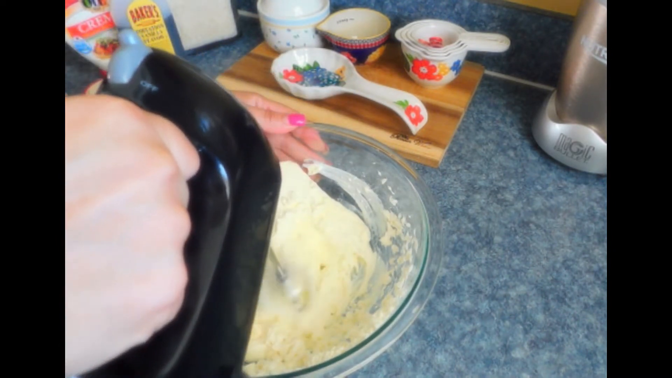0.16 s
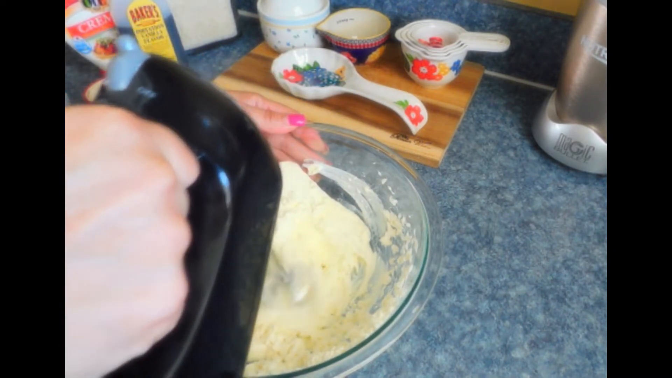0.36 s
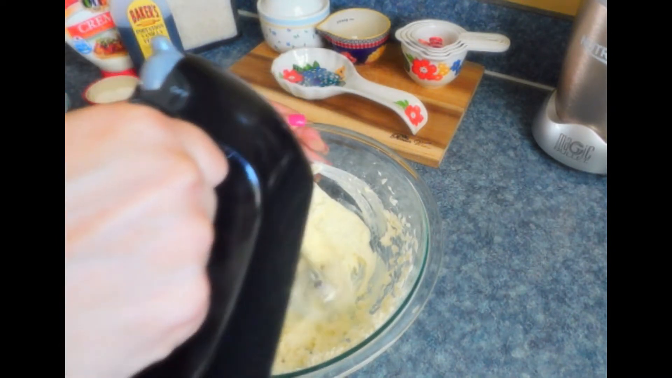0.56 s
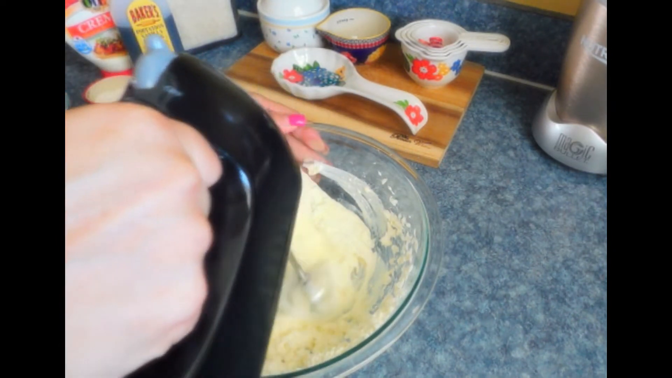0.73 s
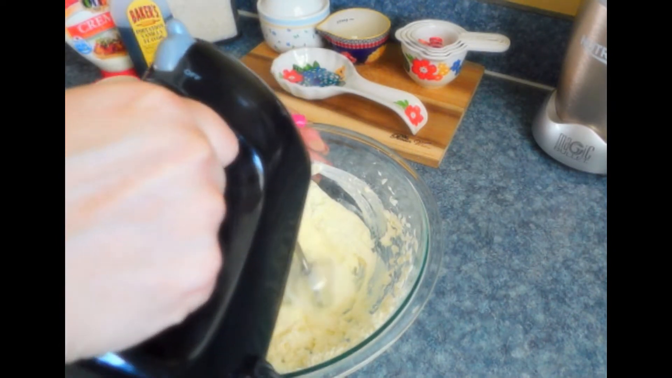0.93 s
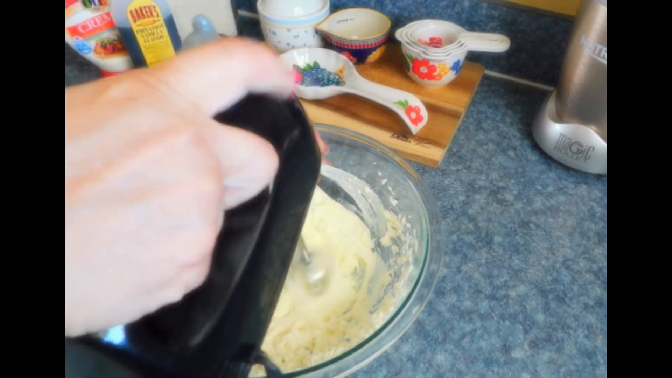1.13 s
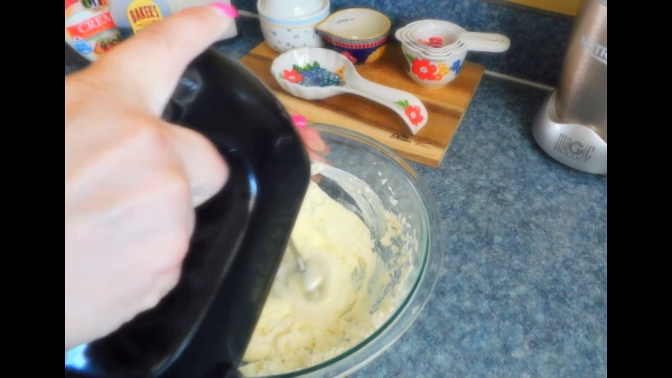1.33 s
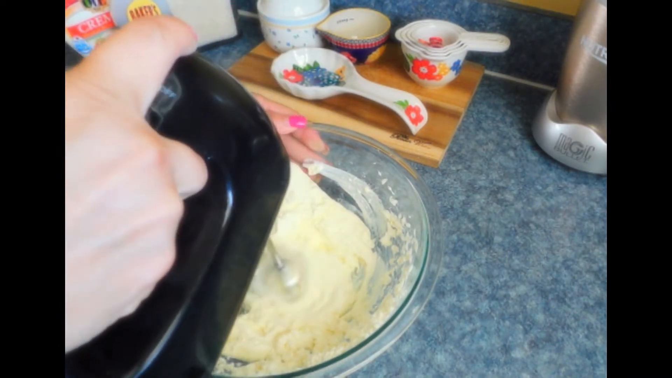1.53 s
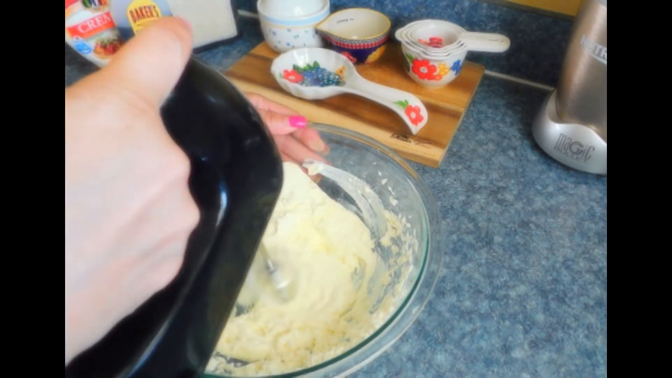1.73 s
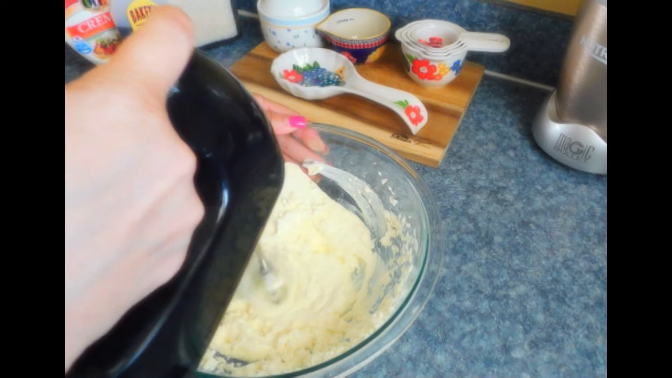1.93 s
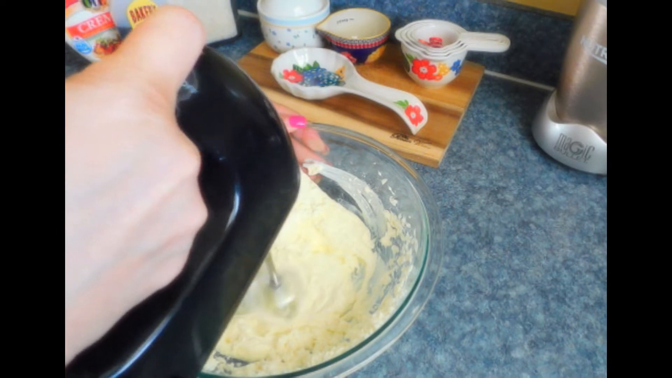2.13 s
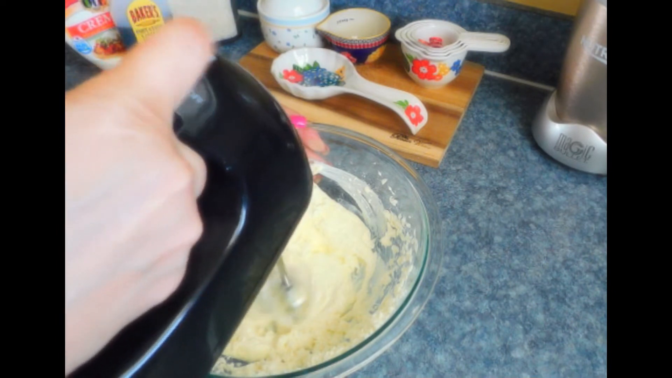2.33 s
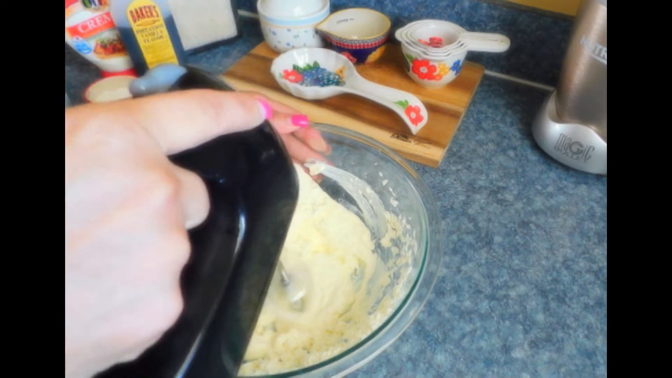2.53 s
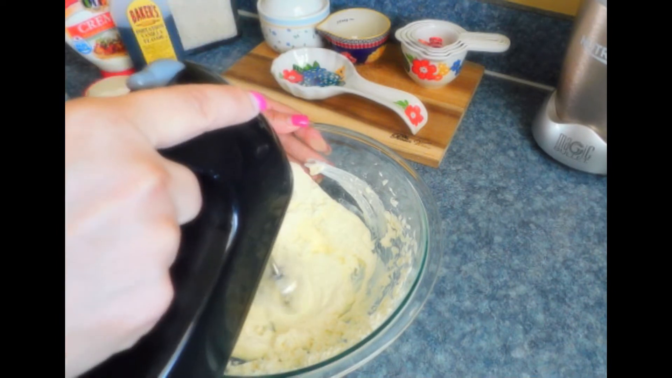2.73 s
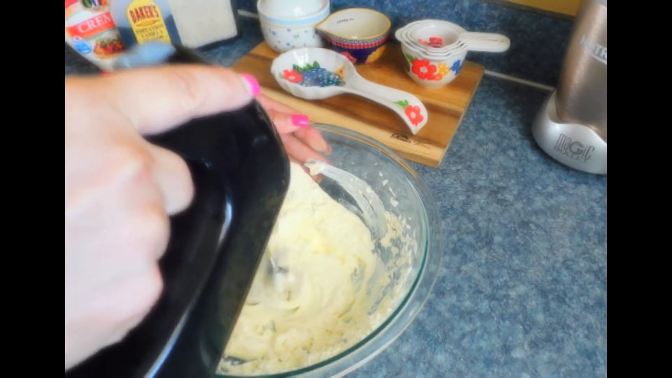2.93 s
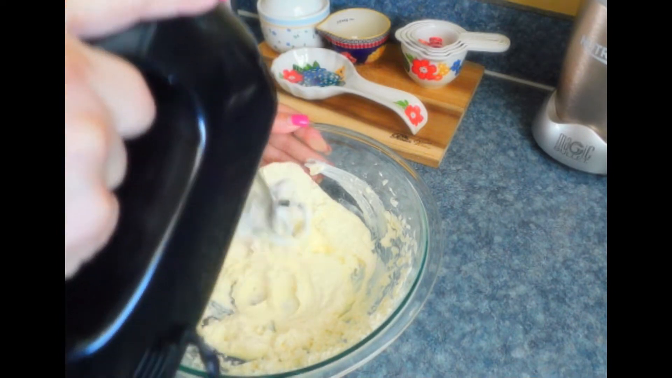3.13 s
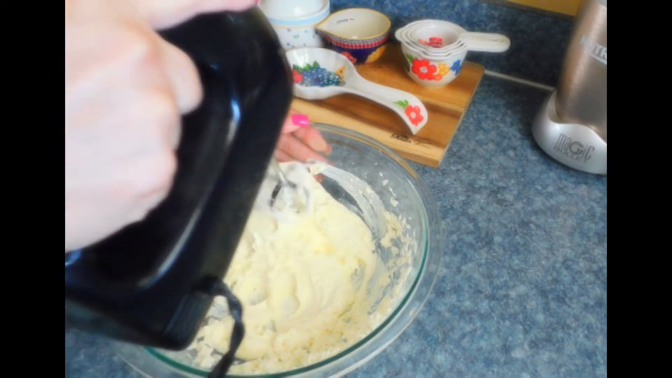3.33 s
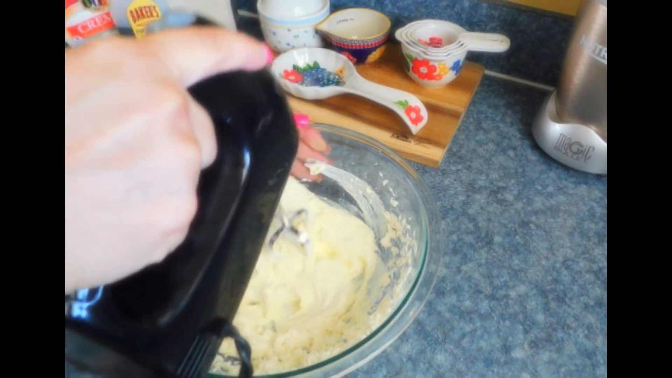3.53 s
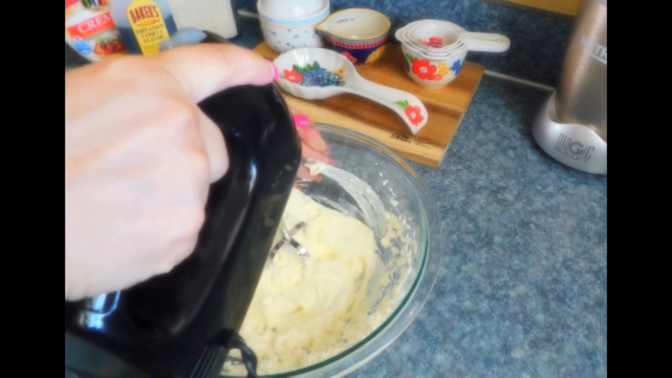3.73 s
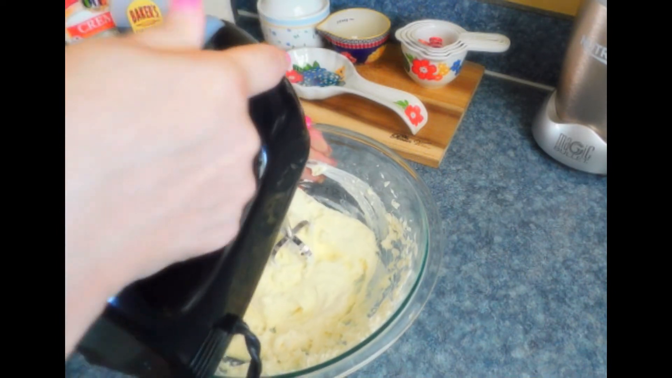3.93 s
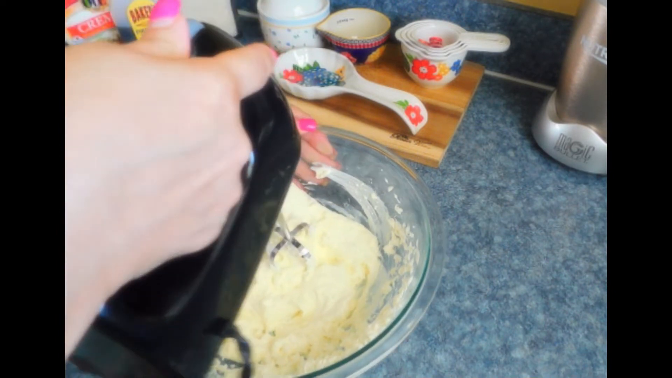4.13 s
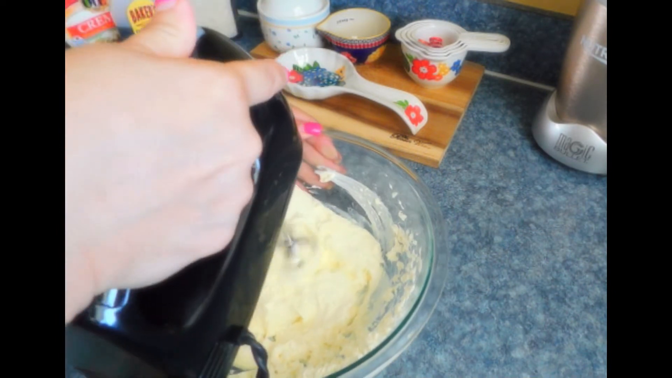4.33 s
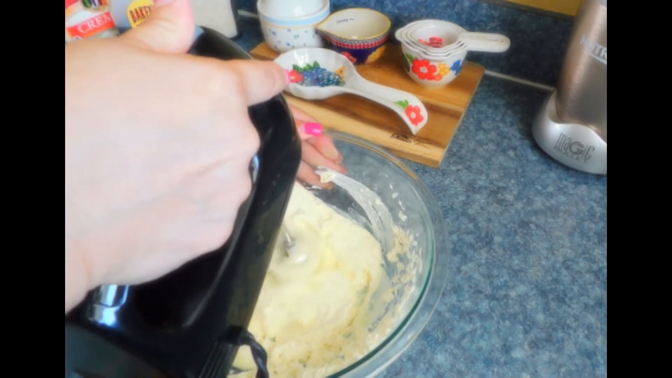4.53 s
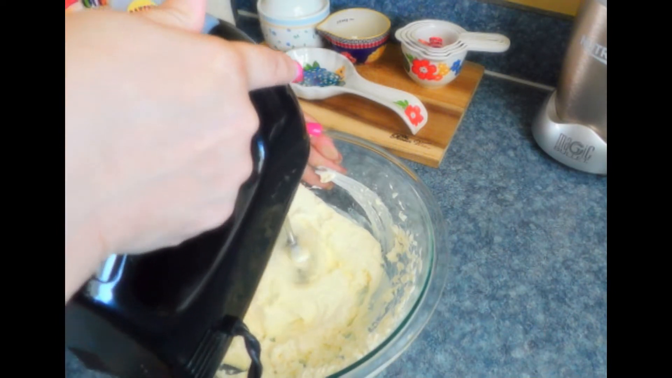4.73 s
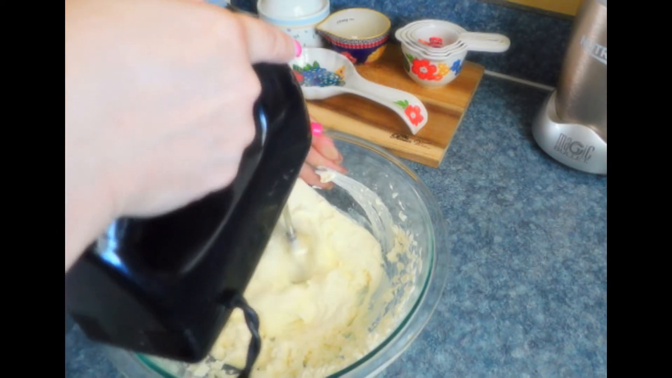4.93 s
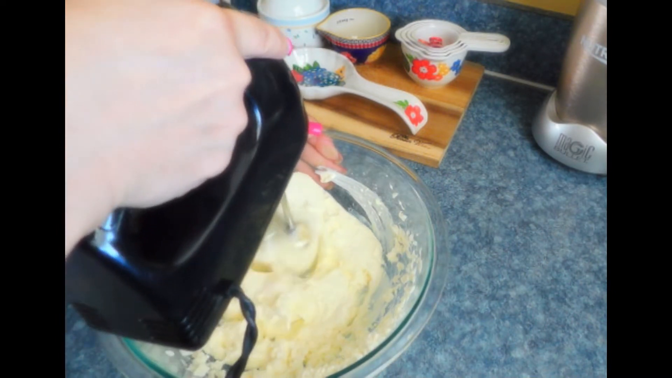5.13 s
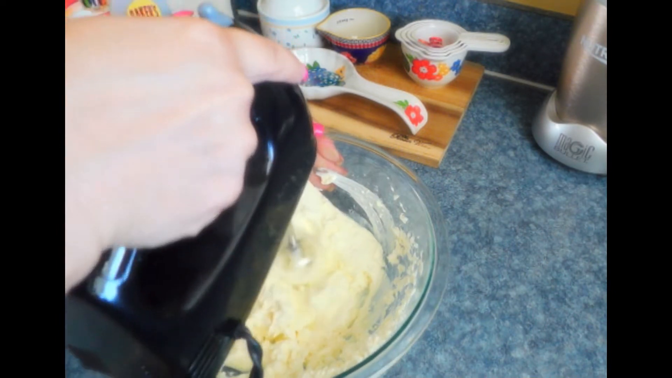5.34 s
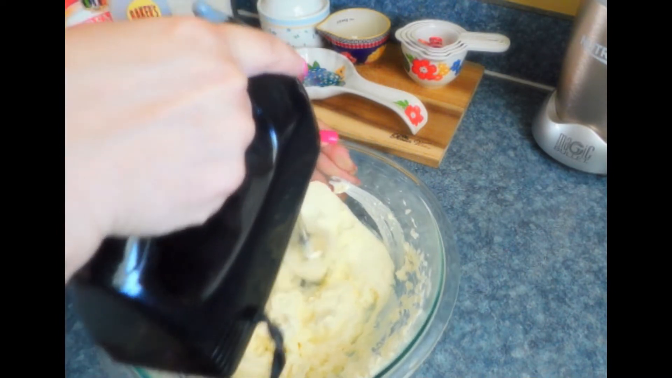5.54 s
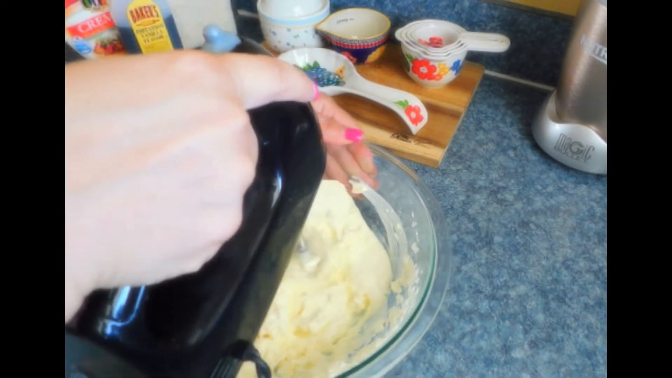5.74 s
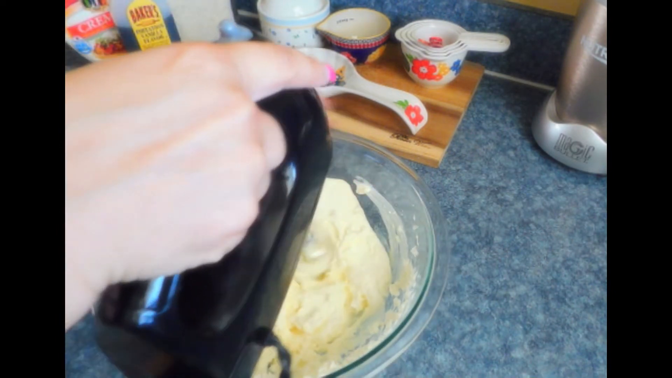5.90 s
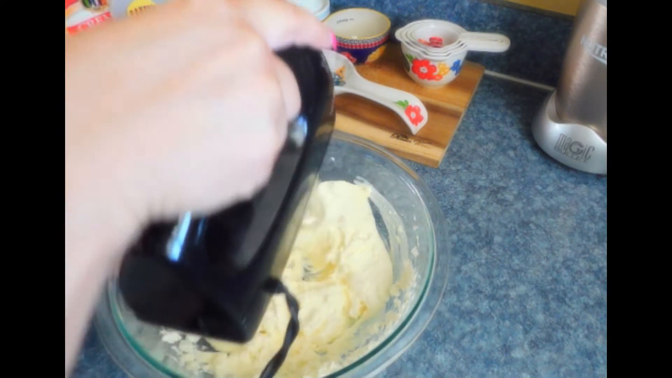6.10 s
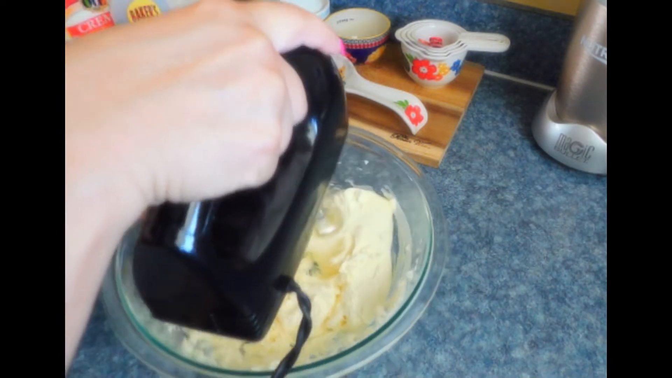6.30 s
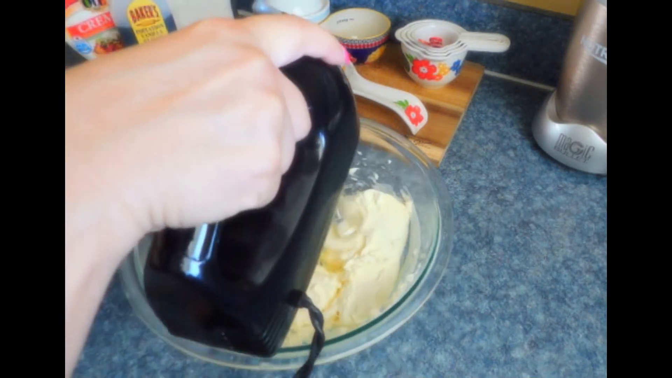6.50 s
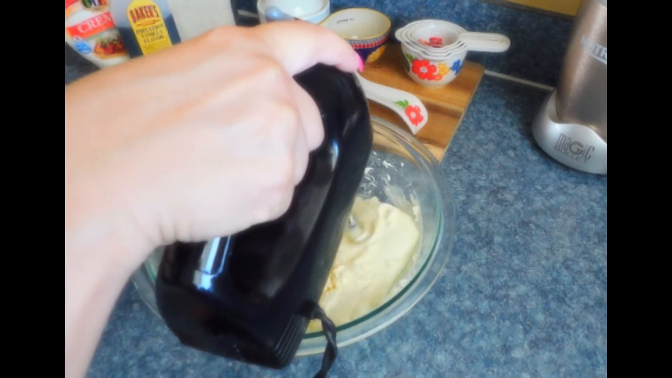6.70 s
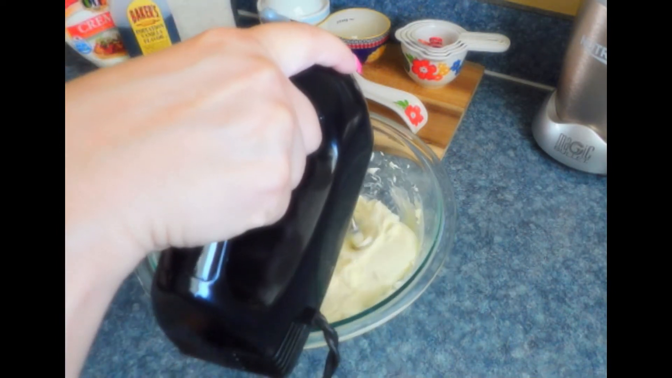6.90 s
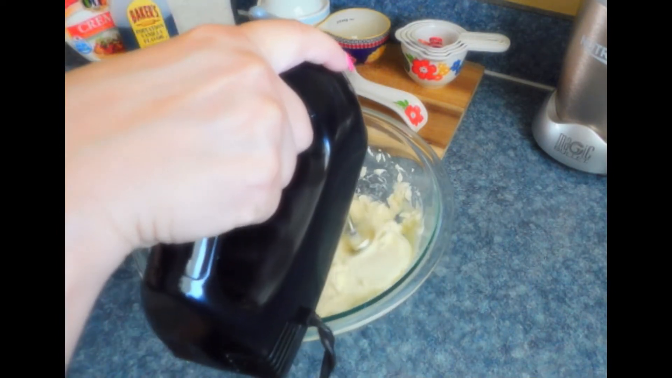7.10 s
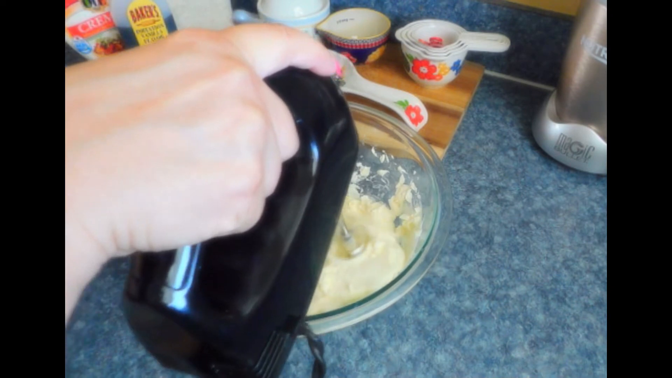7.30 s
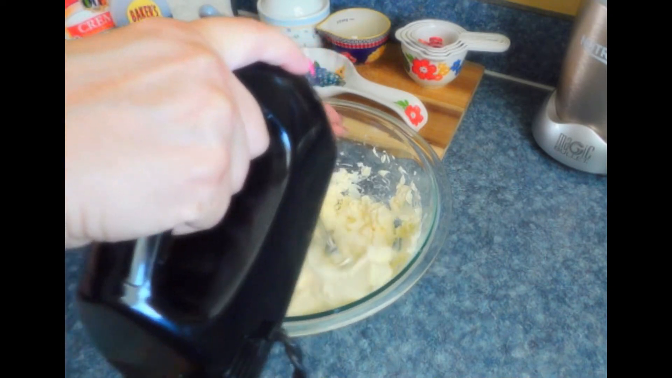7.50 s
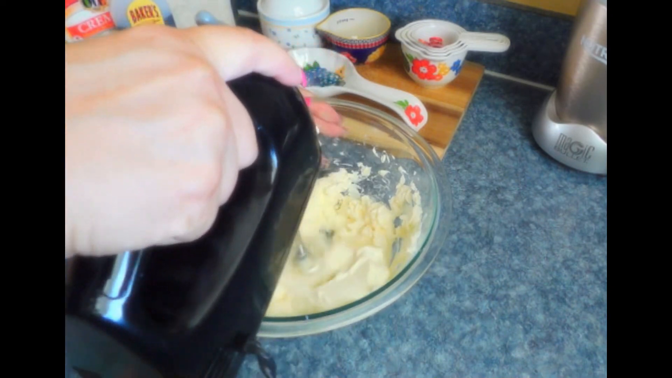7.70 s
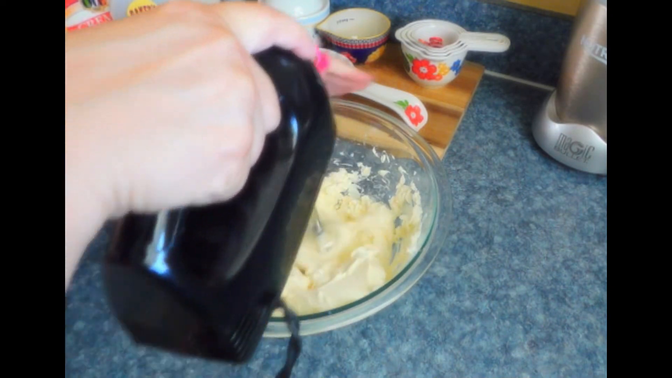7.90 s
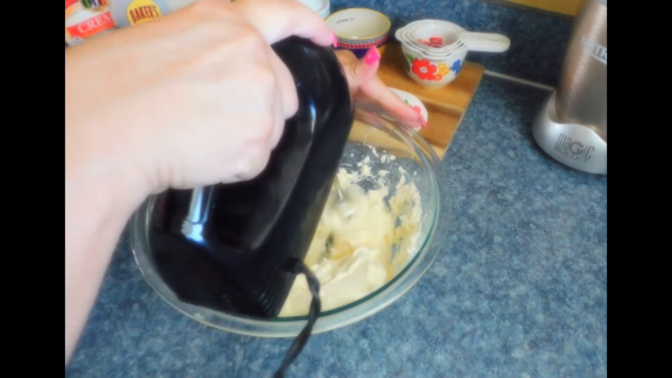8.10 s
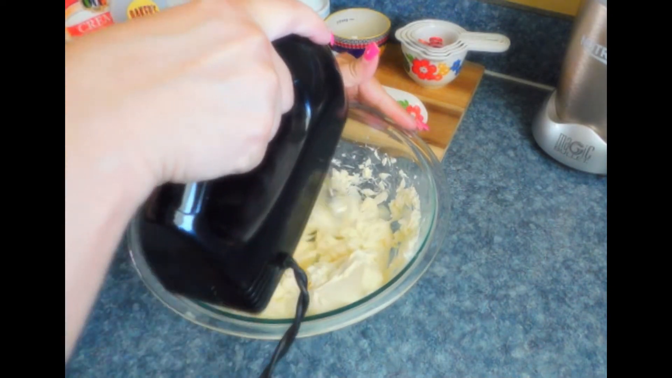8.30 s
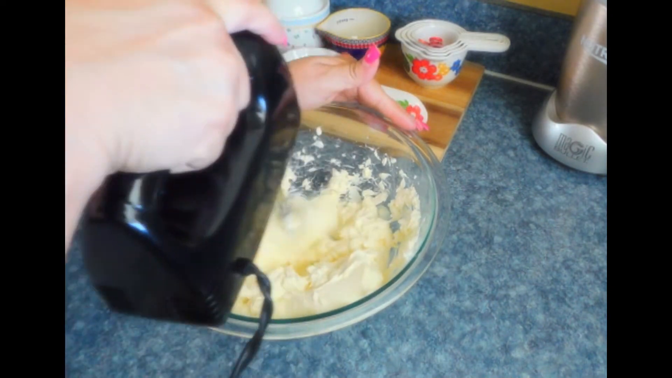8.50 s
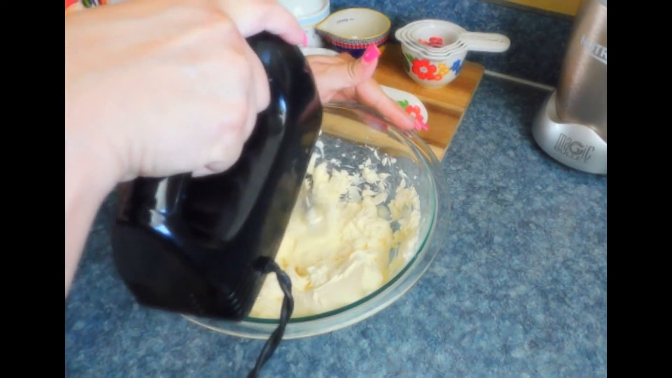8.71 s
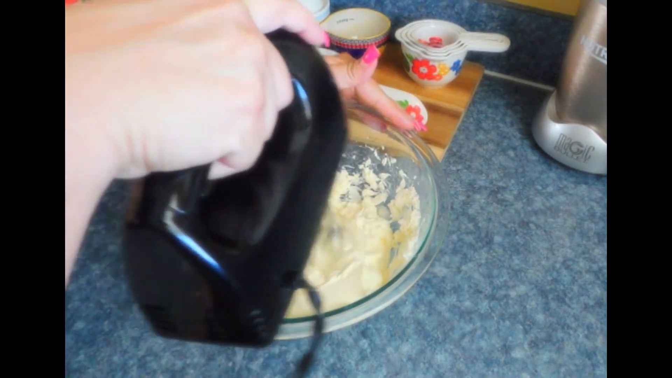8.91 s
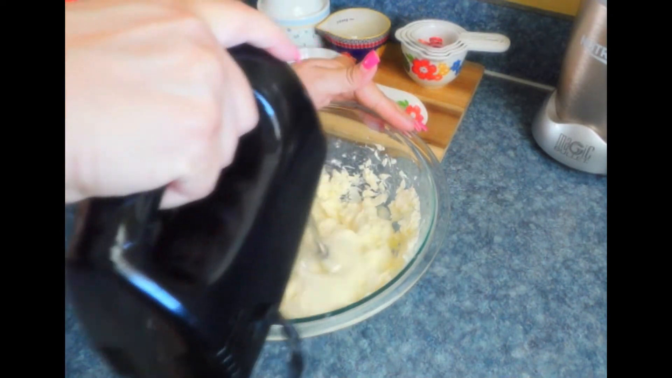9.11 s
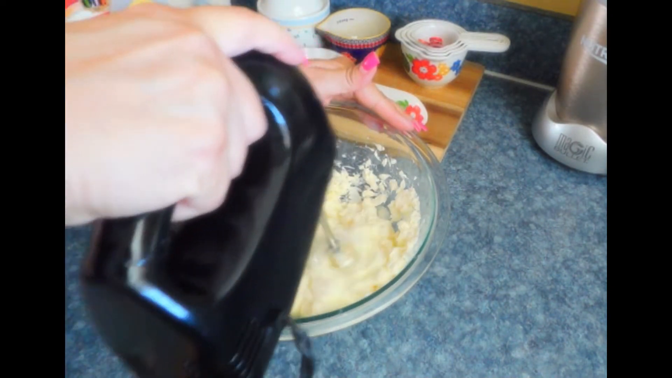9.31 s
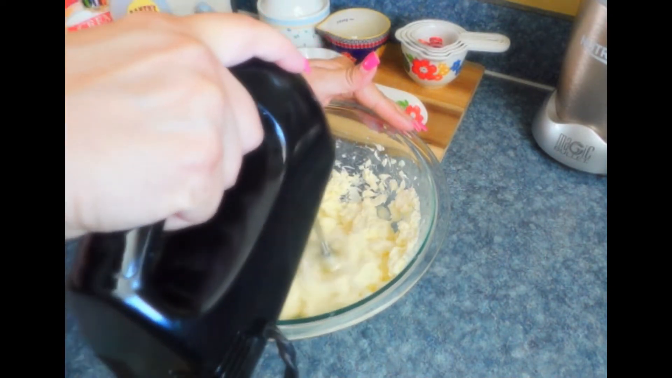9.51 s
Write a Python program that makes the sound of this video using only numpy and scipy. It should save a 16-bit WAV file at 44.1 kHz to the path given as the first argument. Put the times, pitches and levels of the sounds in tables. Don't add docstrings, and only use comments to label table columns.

```python
import sys
import numpy as np
from scipy import signal
from scipy.fft import rfft, irfft, next_fast_len
from scipy.io import wavfile
from scipy.ndimage import uniform_filter1d, map_coordinates

SR = 44100
rng = np.random.default_rng(int(sys.argv[2]) if len(sys.argv) > 2 else 0)


def undo_db(level):
    steps = np.asarray(level, float) / 20
    return 10 ** steps


def put_to_file(sound):
    columns = np.atleast_2d(sound).T
    safe = np.clip(columns, -1, 1)
    whole_steps = np.round(safe * 32767)
    wavfile.write(sys.argv[1], SR, whole_steps.astype(np.int16))


N = 421155

T = np.arange(N) / SR
POWER_OFF_S, POWER_ON_S, STOP_S, MAINS_HZ = 2.15, 4.278, 3.4, 60.0
POWERED = (T < POWER_OFF_S) | (T > POWER_ON_S)
MAINS_PULSE = POWERED * np.sin(2 * np.pi * 2 * MAINS_HZ * T)
SLOTS = 12
BITE_S, BITE_LENGTH_S = 4.665, .045
CONTACT_S = .0015
FRAME = 512
# multiple of shaft rate, centre t/s, length/s, level/dB
SHAFT_SWELLS = [(1, 2.9, .14, 6), (2, 4.62, .4, 9), (3, 4.5, .3, 6), (3, 5.03, .4, 5), (4, 4.45, .25, 6),
                (2, 5.7, .7, 1), (3, 1, 2, 3), (3, 6.6, .6, 3), (36, 1, 2.4, -3), (36, 7.1, 5, 4),
                (35, 7.1, 5, 6), (24, 7.1, 5, 2), (3, 2.9, .6, 4), (4, 3, .4, 4), (3, 8.0, .5, 5),
                (2, 8.0, .5, 4), (4, 2.4, .4, 4), (8, 2.5, .2, 7), (6, 2.4, .3, 5), (9, 5.7, .6, 3),
                (12, 2.42, .1, 3), (12, 2.66, .24, 10), (12, 2.98, .2, 15), (12, 4.4, .2, 3),
                (12, 4.62, .1, 3), (24, 3.25, .16, 7), (24, 4.45, .2, 4), (36, 4.5, .3, -8),
                (48, 4.5, .3, -8), (36, 2.4, .4, 7), (48, 3.27, .12, 8)]


def unit(x):
    return x / np.sqrt(np.mean(x ** 2))


def on_log(points, hz):
    f, v = np.transpose(points)
    return np.interp(np.log(np.maximum(hz, 1)), np.log(f), v)


def colour(x, db_at):
    size = next_fast_len(N)
    gain = undo_db(db_at(np.arange(size // 2 + 1) * SR / size))
    return irfft(rfft(x, size) * gain, size)[..., :N]


def bandpass(x, low, high, order=2):
    return signal.sosfilt(signal.butter(order, [low, high], "band", fs=SR, output="sos"), x)


def resonance_db(hz, modes):
    power = sum(undo_db(db) ** 2 / (1 + (2 * (hz - f) / w) ** 2) for f, w, db in modes)
    return 10 * np.log10(1 + power)


def walk(rate):
    k = int(SR / rate)
    return 0.67 * uniform_filter1d(np.repeat(rng.standard_normal(N // k + 1), k), k)[:N]


def swells(rows, multiple=None):
    rows = [row[-3:] for row in rows if multiple in (None, row[0])]
    if not rows:
        return 0
    t = np.arange(0, N + FRAME, FRAME) / SR
    bumps = sum(db * np.exp(-(2 * (t - s) / length) ** 4) for s, length, db in rows)
    return np.interp(T, t, bumps)


def kitchen():
    # f/Hz, level/dB per Hz
    room_hiss = [(25, -20), (45, 1), (65, -2), (85, -6), (160, -2), (350, 1.5), (700, 9.5), (1200, 3.5),
                 (2400, -2), (4000, -7), (8000, -12.5), (15000, -20)]
    noise = rng.standard_normal((3, N))
    return undo_db(-50.5) * unit(colour(noise[:2] + 1.1 * noise[2], lambda f: on_log(room_hiss, f)))


def room(x, t60_low, t60_high, wet_db):
    t = np.arange(SR) / SR
    noise = rng.standard_normal((2, SR)) * np.minimum(t / 0.0024, 1)
    low = bandpass(noise, 450, 3500, order=1)
    tail = low * undo_db(-60 * t / t60_low) + 0.14 * noise * undo_db(-60 * t / t60_high)
    return x + undo_db(wet_db) * signal.fftconvolve(x[None], tail, axes=1)[:, :N]


def ring(hz, t60):
    t = np.arange(int(.4 * SR)) / SR
    return np.sin(2 * np.pi * hz * t) * np.exp(-np.log(1000) * t / t60) * np.minimum(t / CONTACT_S, 1)


def add(out, s, sound):
    i = int(s * SR)
    out[i:i + len(sound)] += sound[:N - i]


def knocks():
    # t/s, peak level/dB, ring f/Hz, crack level/dB
    blows = [(0.483, -12, 3750, -27), (0.539, -4.5, 1380, -13), (0.699, -8, 1770, -31),
             (1.886, -16, 1870, -12), (1.888, -7, 1155, -30), (1.908, -11, 900, -30),
             (2.017, -18, 2600, -30), (2.006, -1.5, 1144, -29.5), (2.196, -11, 1640, -28),
             (0.47, -10, 885, -30), (2.198, -9, 3950, -30), (3.358, -26, 4440, -30),
             (3.337, -17, 1860, -34), (3.355, -11, 1310, -31), (3.357, -17, 2500, -30),
             (3.357, -18, 1780, -30), (3.518, -26, 3200, -30), (3.527, -19.5, 3600, -40),
             (3.527, -20, 1850, -30), (3.606, -29, 2100, -35), (3.546, -22, 1430, -32),
             (3.593, -31, 1480, -35), (3.987, -29.5, 1280, -32), (4.093, -22.5, 1210, -45),
             (4.173, -35, 3300, -30), (4.173, -29, 794, -30), (4.195, -24, 1400, -30),
             (4.194, -26, 2330, -34), (4.218, -31, 1397, -40), (4.244, -29, 1400, -30),
             (4.284, -22, 3650, -2), (4.290, -12, 690, -26), (4.368, -7.5, 2270, -28),
             (4.370, -18, 3720, -30), (5.499, -21, 1980, -30), (6.139, -6, 1300, -37),
             (7.303, -9, 860, -25), (7.465, -4, 820, -24), (7.567, -7.5, 3130, -30), (7.569, -17, 810, -24),
             (7.645, -5, 865, -10), (8.085, -15, 3737, -40), (8.986, -15, 3340, -27),
             (9.151, -5, 1200, -39), (9.383, -7, 868, -25), (9.451, -8, 802, -9)]
    out = np.zeros(N)
    t = np.arange(900) / SR
    contact = np.minimum(t / CONTACT_S, 1)
    for s, db, hz, crack_db in blows:
        noise = rng.standard_normal(len(t))
        burst = bandpass(noise, .6 * hz, 1.7 * hz) * np.exp(-t / .008) * contact
        crack = np.diff(noise, prepend=0) / 3 * np.exp(-t / 0.004)
        add(out, s, undo_db(db - 4) * ring(hz, 0.025 * min(1, 1400 / hz)))
        add(out, s, undo_db(db - 3) * burst)
        add(out, s, undo_db(db + crack_db + 5) * crack)
    return out


def lever_snap():
    # f/Hz, level/dB, t60/s
    shell_modes = [(45, -25, .04), (95, -20, .03), (170, -15, .03), (330, -13, .015), (480, -19, .03),
                   (670, -11, .03), (1130, -8, .02), (1240, 2, .045), (1370, -8, .02), (2100, -8, .005),
                   (2860, -6, .004), (3665, -6, .004), (4600, -2, .004)]
    snap_s, snap_db = 3.638, 3
    t = np.arange(900) / SR
    contact = np.minimum(t / CONTACT_S, 1)
    shell, click, crack = np.zeros((3, N))
    add(shell, snap_s, undo_db(snap_db - 8) * sum(undo_db(db) * ring(hz, t60) for hz, db, t60 in shell_modes))
    add(shell, snap_s + 0.013, undo_db(-22) * (ring(222, 0.024) + ring(450, 0.04)))
    impulse = 1. * (t == 0)
    add(click, snap_s, undo_db(20) * bandpass(bandpass(impulse, 750, 5600), 750, 5600))
    dull = bandpass(rng.standard_normal(len(t)), 750, 5600) * np.exp(-t / 0.0057) * contact
    bright = np.diff(rng.standard_normal(len(t)), prepend=0) * np.exp(-t / 0.0027) * contact
    add(crack, snap_s, undo_db(snap_db - 2.5) * dull + undo_db(snap_db - 15) * bright)
    return shell, click, crack


def hits():
    shell, click, crack = lever_snap()
    return room(knocks() + shell + click, 0.61, 0.3, -35) - click + crack


def controls():
    # t/s, shaft f/Hz
    driven_speed = [(0, 359.6), (.69, 372.8), (2.062, 382.8), (2.199, 371.7), (5.241, 291.1), (5.42, 311.5),
                    (5.57, 302.6), (6.032, 332.7), (6.23, 309.2), (6.901, 302.3), (7.35, 306.8),
                    (7.601, 268.9), (7.76, 274), (8.109, 316.5), (8.399, 325.3), (8.93, 325.5),
                    (9.218, 301.2), (9.55, 295.8)]
    # t/s, length/s, level/dB
    presses = [(0.485, 0.066, 12.5), (0.64, 0.12, 7.5), (1.48, 0.031, 4), (1.848, 0.074, 9),
               (2.0, 0.028, 6), (5.466, 0.076, 8), (6.08, 0.19, 7), (6.274, 0.091, 10), (6.719, 0.84, 9.5),
               (7.544, 0.26, 8.5), (8.044, 0.19, 5.5), (8.556, 0.062, 7.5), (8.974, 0.59, 13)]
    inertia_s, press_ramp_s, usual_hz = .07, 0.033, 320
    brake_s, brake_hz_per_s = 2.22, 340
    lift_s, coast_hz_per_s = 2.6, 237
    kick_hz, spin_up_s, spin_up_shape, bite_sag_hz = 28, .22, 1.4, 15
    when = np.where(T < STOP_S, T, np.maximum(T, driven_speed[4][0] - inertia_s))
    driven = np.interp(when, *np.transpose(driven_speed))
    driven = uniform_filter1d(driven, size=int(inertia_s * SR))
    braked = brake_hz_per_s * np.clip(T - brake_s, 0, lift_s - brake_s)
    coast = driven[int(brake_s * SR)] - braked - coast_hz_per_s * np.maximum(T - lift_s, 0)
    rise = 1 - np.exp(-(np.maximum(T - POWER_ON_S, 0) / spin_up_s) ** spin_up_shape)
    restart = kick_hz + (driven - kick_hz) * rise
    hz = np.where(T < brake_s, driven, np.where(T < POWER_ON_S, np.maximum(coast, 20), restart))
    hz = hz - bite_sag_hz * np.exp(-((T - BITE_S) / BITE_LENGTH_S) ** 2)
    press = sum(db * np.clip(np.minimum(T - s, s + length - T) / press_ramp_s + .5, 0, 1)
                for s, length, db in presses)
    return hz, 20 * np.log10(hz / usual_hz), press, (T < brake_s) | (T > POWER_ON_S)


def stillness():
    stopped = -60 * np.clip((T - STOP_S) / .22, 0, 1) * (T < POWER_ON_S)
    onset_dip = 9 * np.clip(1 - (T - POWER_ON_S) / .02, 0, 1) * (T >= POWER_ON_S)
    return stopped - onset_dip


def bowl(press_db, turns):
    # f/Hz, width/Hz, level/dB
    glass_modes = [(685.4, 50, -7), (768.4, 36, -2.5), (884, 113, -5), (1003, 150, -4.5)]
    stroke = (turns / 21.5 + 0.15 * walk(2.4)) % 1
    push = np.exp(-stroke / 0.38) * rng.standard_normal(N)
    drum = sum(undo_db(db) * unit(bandpass(push, hz - w / 2, hz + w / 2)) for hz, w, db in glass_modes)
    return drum * undo_db(-43.5 + press_db)


def tone(multiple, turns, db, waver_db):
    lag = np.array([[0], [.04 * multiple * np.sign(13 - multiple)]]) * (1 + (multiple > 29))
    level = np.sqrt(2) * undo_db(db + waver_db * walk(13))
    return level * np.sin(2 * np.pi * (multiple * turns % 1) + 0.9 * walk(30) - lag)


def casing_db(hz):
    # f/Hz, level/dB per Hz
    broad = [(190, -19), (330, -10.5), (526, -6.5), (881, -4.5), (955, -6), (1360, 3), (1680, -1.5),
             (2140, 3), (4480, -10), (6290, -16), (8960, -19), (15500, -38.5)]
    # f/Hz, width/Hz, level/dB
    shell_modes = [(677, 16.7, 9.5), (750, 13, -12), (884, 25.4, 10), (1170, 83, 2.5), (1332, 28, 8),
                   (1460, 38, 5), (1616, 30, 6), (1782, 54, 9), (1989, 49, 6.5), (2153, 57, 6.5),
                   (2500, 89, 4.5), (2664, 75, 1), (2887, 52, 6.5), (5080, 550, -2.5)]
    low_cut = 40 * np.log10(1 + (260 / (hz + 1)) ** 2)
    return on_log(broad, hz) + resonance_db(hz, shell_modes) - low_cut


def shaft_lines(hz, turns, speed_db, pulling, still_db):
    hums = [(1, -30, 2.4, .7), (2, -40, 1.2, .2), (3, -42, 1.2, .3), (4, -46, 1.2, .3), (6, -49, 1, .6),
            (8, -44, 1, 2), (9, -38.5, 5, 3), (10, -45, 2, 3)]
    grid = np.arange(0, 20000, 5)
    shell_db = casing_db(grid)
    out = 0
    for k, db, drive, coast in hums:
        level_db = db + np.interp(k * hz, grid, shell_db) + np.where(pulling, drive, coast) * speed_db
        out = out + tone(k, turns, level_db + still_db + swells(SHAFT_SWELLS, k), 3.1)
    return out


def pull_db(hz, pulling):
    slow = 12 * pulling * np.clip(1 - hz / 260, 0, 1) ** .5
    bite = 11 * np.exp(-((T - BITE_S + .04) / BITE_LENGTH_S) ** 4)
    return slow + bite - 20 * np.clip(1.6 - hz / 55, 0, 1)


def slot_lines(hz, turns, speed_db, pulling, still_db):
    high_lines = [(21, -55), (22, -55), (24, -52), (26, -58), (30, -57), (32, -61), (33, -59), (35, -60),
                  (36, -55), (48, -64)]
    # f/Hz, width/Hz, level/dB
    slot_rings = [(2100, 500, 18), (4400, 600, 8)]
    slot_db = np.where(pulling, .6 * np.maximum(speed_db, -1.5), -3) + still_db
    out = 0
    for k, db in high_lines:
        level_db = db + slot_db + swells(SHAFT_SWELLS, k)
        if k % SLOTS == 0 or k > 29:
            level_db = level_db + sum(lift / (1 + (2 * (k * hz - f) / w) ** 2) for f, w, lift in slot_rings)
        if k == 2 * SLOTS:
            level_db = level_db + .2 * pull_db(hz, pulling)
        out = out + tone(k, turns, level_db, 4)
    return out


def slot_whine(hz, turns, speed_db, press, pulling, still_db):
    # f/Hz, width/Hz, level/dB
    whine_path = [(1240, 200, 12), (2880, 250, 7), (3250, 130, 11), (3540, 140, 7), (3640, 50, 6),
                  (3800, 110, 9), (3975, 50, 3), (4340, 170, 12), (4570, 80, 6)]
    # centre t/s, length/s, level/dB
    whine_swells = [(.03, .12, 2), (.22, 0.16, 2), (.7, .2, -6), (1.13, 0.18, -10), (1.54, .12, -9),
                    (1.76, 0.13, 1.5), (2.0, .12, -4), (4.8, 0.1, -4), (5.43, 0.13, 0), (5.74, .07, 1),
                    (6.32, 0.32, -7), (6.55, 0.088, 0), (6.86, 0.27, -6), (7.27, 0.27, 7), (7.65, 0.09, 5),
                    (7.76, .06, -3), (8.0, 0.05, 4), (8.09, .06, 10), (8.58, 0.47, -9), (8.93, .08, 4),
                    (9.08, 0.062, 7)]
    db = -41 + pull_db(hz, pulling) + resonance_db(SLOTS * hz, whine_path)
    db = db + ~pulling * (-5 + .75 * speed_db) - .33 * press + still_db
    db = db + swells(whine_swells) + swells(SHAFT_SWELLS, SLOTS)
    beat = .15 + .7 * np.clip(1.3 - hz / 200, 0, 1)
    return tone(SLOTS, turns, db, 2) * (1 + beat * MAINS_PULSE)


def rattle(turns, repeat_db, click_db):
    pattern = rng.standard_normal((400, 97))
    pattern[:, -1] = pattern[:, 0]
    where = [turns / 14, turns % 1 * 96]
    repeat = map_coordinates(pattern, where, order=1, mode="wrap")
    clicks = (rng.random(N) < 250 / SR) * rng.standard_normal(N)
    scrape = rng.standard_normal(N) + undo_db(repeat_db) * unit(repeat)
    return (1 + 0.048 * MAINS_PULSE) * scrape + undo_db(click_db) * unit(clicks)


def breathe(pair, swell):
    layer_hz = (750, 1300, 2400, 7000, 13000)
    # t/s, length/s, f/Hz, width/Hz, level/dB
    facing = [(-0.2, 0.65, 3280, 250.0, 7), (-0.11, 1.4, 2680, 251, 4), (-0.1, 0.59, 2840.0, 400.0, 3),
              (-0.06, 1.4, 2270, 700.0, -5), (0.62, 0.81, 1520, 150.0, 7), (0.78, 0.74, 3300, 700.0, 3),
              (0.882, 1, 2680, 250.0, 4.5), (1.238, 1.3, 2190, 150.0, -3), (1.29, 1.37, 2416, 250.0, -4),
              (4.28, 0.29, 1860, 150.4, 10.5), (4.28, 0.26, 2230, 152, 11), (4.28, 0.31, 4780, 198, 9),
              (4.265, 0.36, 650, 250.0, 9), (4.28, 1.3, 1880, 696, 3), (4.28, 1.6, 2860, 700.0, -1),
              (4.292, 0.39, 1310, 150.0, 6), (1.4, 0.35, 2200, 100, 1), (8.2, 0.42, 1300, 200, -4),
              (1.85, 0.27, 2044, 300, 0.5), (4.393, 0.33, 2950, 250.0, 10), (4.67, 1.77, 2280, 148, 3),
              (4.754, 0.46, 1940, 150.0, 7), (5.01, 0.51, 2320, 250.0, 0.5), (5.33, 2.1, 1360, 250.0, 2.5),
              (5.45, 0.28, 2500.0, 700.0, 0.5), (6.11, 0.84, 3630, 150.1, 8),
              (6.23, 0.75, 2500.0, 398.5, 4), (6.36, 0.42, 2130, 150.0, 5), (6.442, 0.74, 1040, 250.0, 8.5),
              (6.54, 0.31, 2744, 149.8, 8), (6.85, 0.27, 1280, 400.0, -3.5),
              (7.049, 0.59, 2500.0, 251, 2.5), (7.12, 1.44, 3663, 246.8, 5), (7.211, 0.85, 1015, 402, 9),
              (7.29, 1.6, 1840, 400.0, -2), (7.61, 1.96, 1562, 150.0, 3.5), (7.65, 1.53, 2470, 250.0, 5.5),
              (7.7, 1.5, 4200, 400.0, 3.5), (8.316, 0.71, 1090, 149.5, 9.5), (8.871, 0.13, 2200, 150.0, 0),
              (8.919, 0.37, 2316, 149, 4), (9.138, 0.65, 1330, 400.4, 6.5)]
    f, s, z = signal.stft(pair, SR, nperseg=FRAME, noverlap=FRAME * 3 // 4)
    at = np.minimum((s * SR).astype(int), N - 1)
    db, jolt, octaves = 0, walk(17), np.log2(f + 1)[:, None]
    for centre in np.arange(7, 14.6, .5):
        share = [np.interp(centre, np.log2(layer_hz), row) for row in np.eye(len(layer_hz))]
        overlap = np.clip(1 - abs(octaves - centre) / .5, 0, 1)
        flicker = 1.2 * walk(2.335) + walk(14) + 0.8 * jolt
        db = db + overlap * (share @ swell[:, at] + flicker[at])
    start, length, hz, width, lift_db = np.transpose(facing)[:, :, None]
    panel_db = lift_db * np.exp(-(2 * (f - hz) / width) ** 2)
    db = db + panel_db.T @ np.exp(-(2 * (s - start) / length - 1) ** 4)
    return signal.istft(z * undo_db(db), SR, nperseg=FRAME, noverlap=FRAME * 3 // 4)[1][:, :N]


def casing_rattle(turns, speed_db, press, pulling):
    # t/s, level/dB
    aim = [(0, -1.5), (2.2, -0.5), (4.3, 5.5), (5.3, 0), (6.0, 1.5), (6.8, 0), (7.5, -2), (7.85, -1),
           (8.2, 1.5), (9.0, -1.5), (9.55, -3)]
    # level/dB, dB per dB of speed driven, the same coasting, dB per dB pressed, dB per dB turned
    layers = [
        (1, 1.45, 1.35, 0.88, 1),
        (-1, 0.35, 0.75, 0.0146, 1),
        (-1, 1.82, 1.86, 0, 0.15),
        (-0.5, 0.9, 0.83, 0.44, -.5),
        (-0.5, 1.8, 1.8, 0.16, -0.1),
    ]
    # f/Hz, side minus mid level/dB
    spread = [(60, 0), (110, 9), (200, -5), (380, -15), (700, -8.5), (1290, -10.5), (2380, -5),
              (4400, -0.5), (8120, 0), (15000, 6.5)]
    turned = np.interp(T, *np.transpose(aim))
    swell = []
    for db, drive, coast, push, turn in layers:
        motor_db = np.where(pulling, drive * np.maximum(speed_db, -8), coast * speed_db)
        swell.append(db + motor_db + push * press + turn * turned)
    mid = colour(rattle(turns, -12.5, -8), casing_db)
    side = colour(rattle(turns, -22.0, -2.0), lambda f: casing_db(f) + on_log(spread, f))
    pair = np.array([mid, side]) / np.std(mid) * undo_db(-19.5)
    mid, side = breathe(pair, np.array(swell))
    return np.array([mid + side, mid - side])


def mixer():
    hz, speed_db, press, pulling = controls()
    turns = np.cumsum(hz) / SR
    still_db = stillness()
    out = casing_rattle(turns, speed_db, press, pulling) * undo_db(still_db)
    out = out + shaft_lines(hz, turns, speed_db, pulling, still_db)
    out = out + slot_lines(hz, turns, speed_db, pulling, still_db)
    out = out + slot_whine(hz, turns, speed_db, press, pulling, still_db)
    return out + bowl(1.45 * press + 0.9 * speed_db + still_db, turns)


def scene():
    # f/Hz, left minus right level/dB
    tilt = [(60, -8.0), (110, -8.0), (200, -7.5), (380, -1.5), (700, -1), (1290, -1), (2380, -3.5),
            (4400, -2.5), (8120, -1), (15000, -3.5)]
    near = mixer() + hits()
    left = colour(near[0], lambda f: on_log(tilt, np.maximum(f, 500)) / 2)
    right = colour(near[1], lambda f: -on_log(tilt, np.maximum(f, 500)) / 2)
    return np.array([left, np.roll(right, shift=1)]) + kitchen()


def top_cut(x):
    return signal.sosfilt(signal.butter(12, 16080, fs=SR, output="sos"), x)


def record(dry):
    # t/s, level/dB
    headroom = [(0, 0), (1.1, -1), (1.6, 0.5), (2.33, -5), (2.41, 9), (4.52, 10), (4.6, -6.5), (4.75, -1),
                (5.2, -1), (5.8, 2.5), (6.6, -0.5), (7.55, -1.5), (7.75, 2), (7.98, 2), (8.1, 0.5),
                (8.45, 3.5), (8.9, 0), (9.1, 2)]
    hz, speed_db, press, pulling = controls()
    ceiling_db = -9.5 + np.where(pulling, -2.44 * speed_db, 6) - 0.33 * press
    ceiling_db += np.interp(T, *np.transpose(headroom))
    ears_db = np.array([[2.1], [-1.6]])
    ceiling = undo_db(np.minimum(ceiling_db, 0) + 1.5 * walk(13) + ears_db)
    excess = dry - np.clip(dry, -ceiling, 1.135 * ceiling)
    thump = signal.sosfilt(signal.butter(1, 350, fs=SR, output="sos"), excess)
    flat = dry - 0.047 * excess - 2.27 * thump
    flat = signal.sosfilt(signal.ellip(10, .2, 70, 15800, fs=SR, output="sos"), flat)
    flat = signal.sosfilt(signal.butter(1, 15, "high", fs=SR, output="sos"), flat)
    return top_cut(np.clip(flat, -1, 1))


dry = scene()
out = record(dry)
put_to_file(out)
```